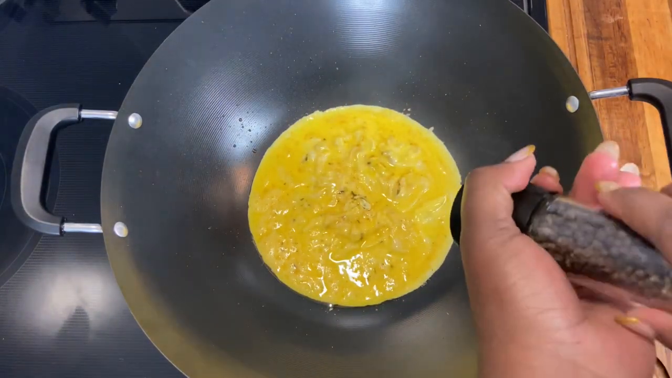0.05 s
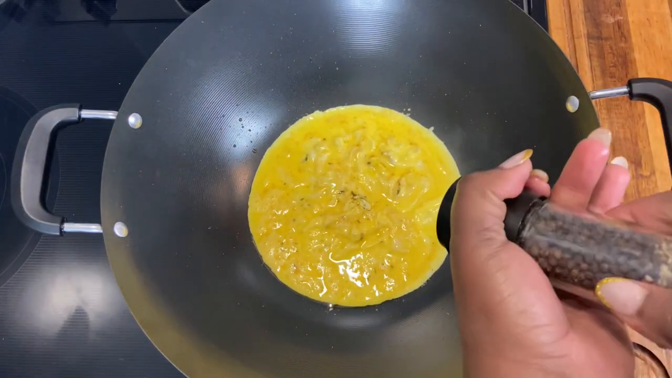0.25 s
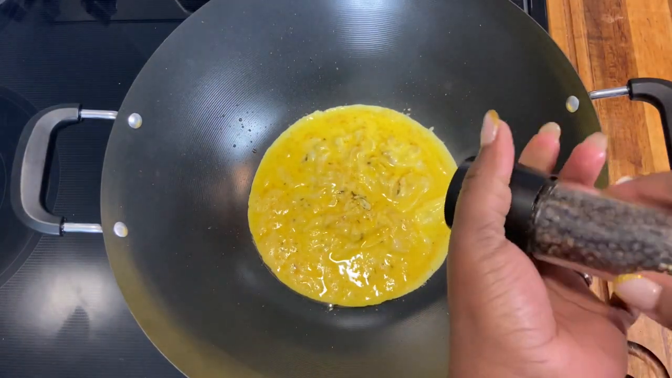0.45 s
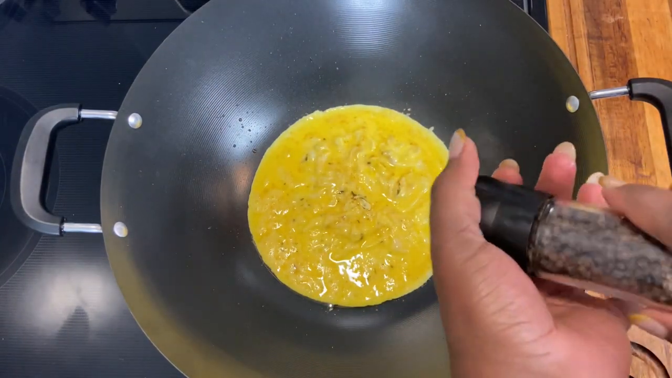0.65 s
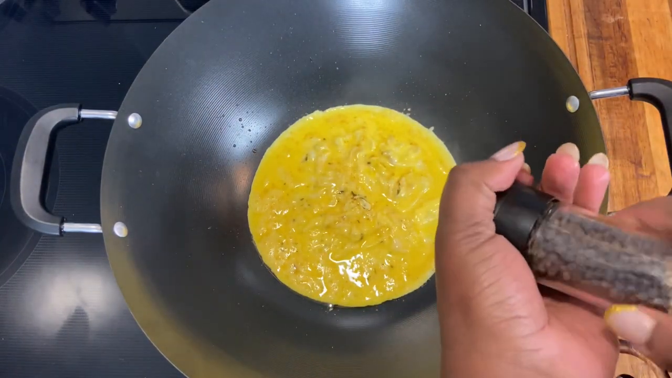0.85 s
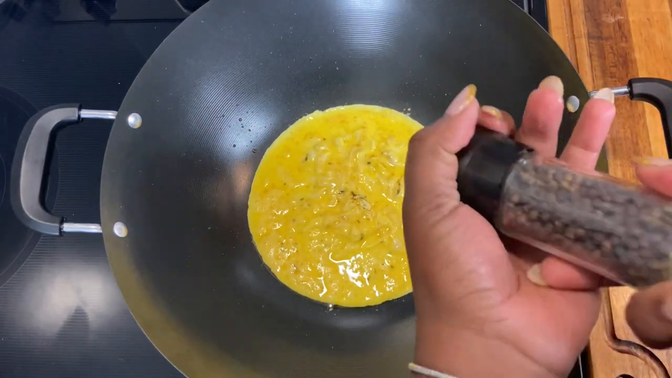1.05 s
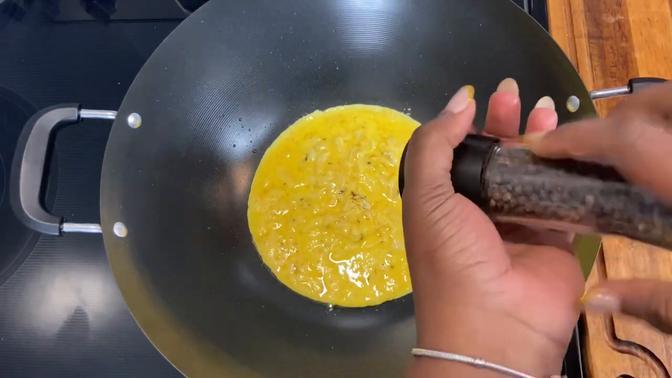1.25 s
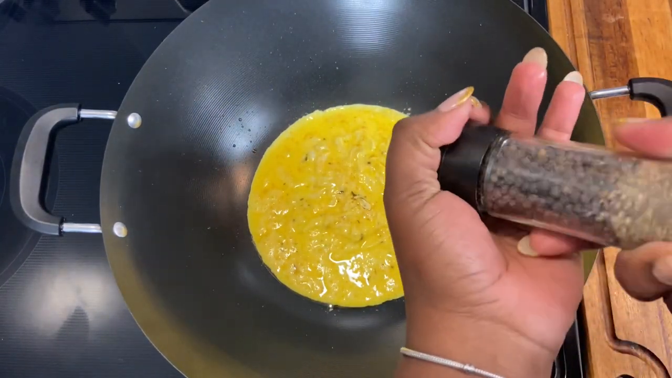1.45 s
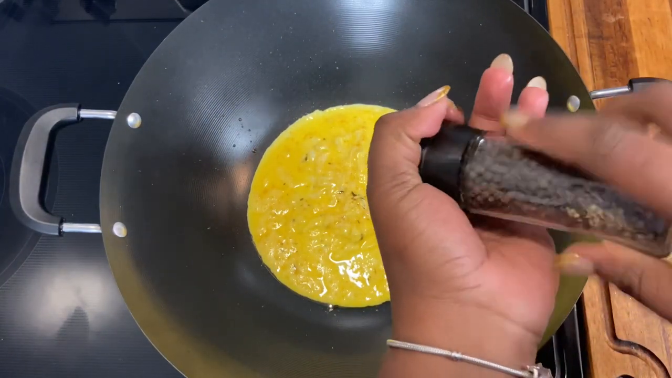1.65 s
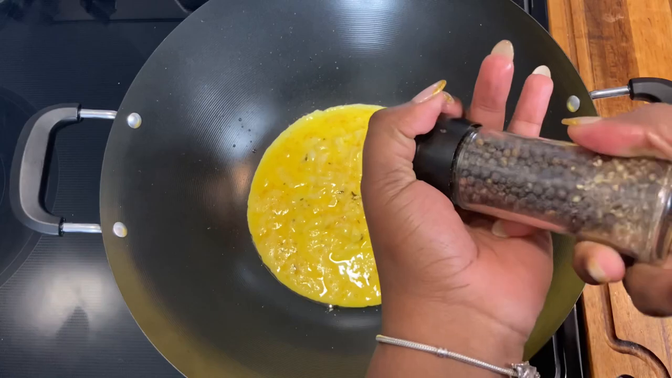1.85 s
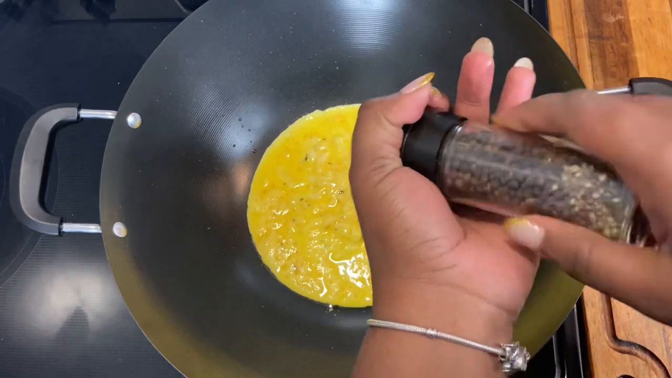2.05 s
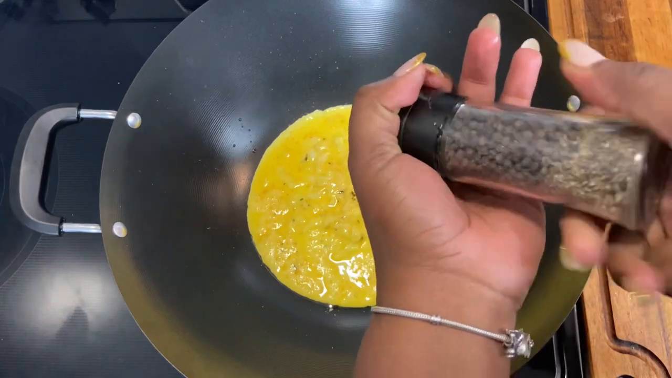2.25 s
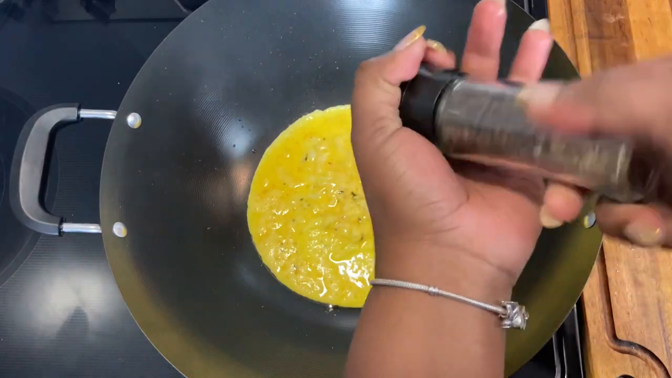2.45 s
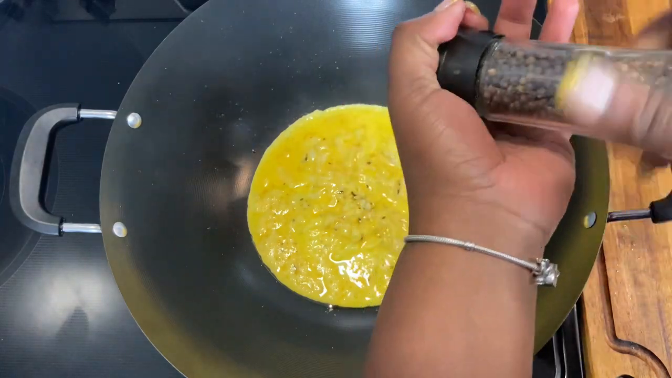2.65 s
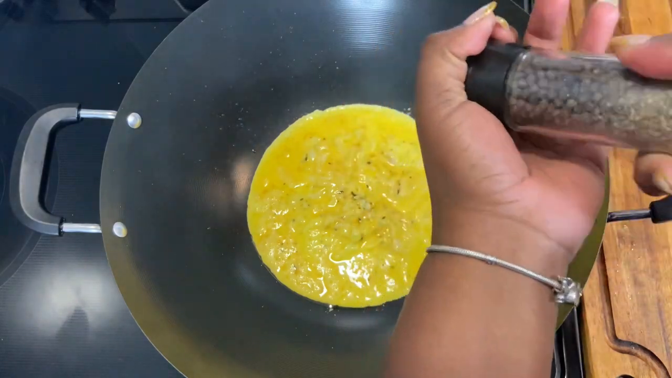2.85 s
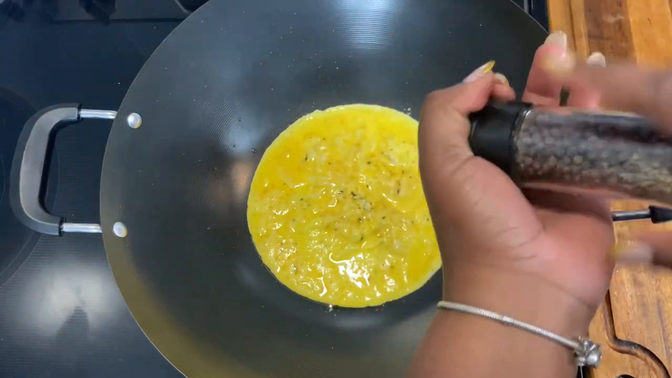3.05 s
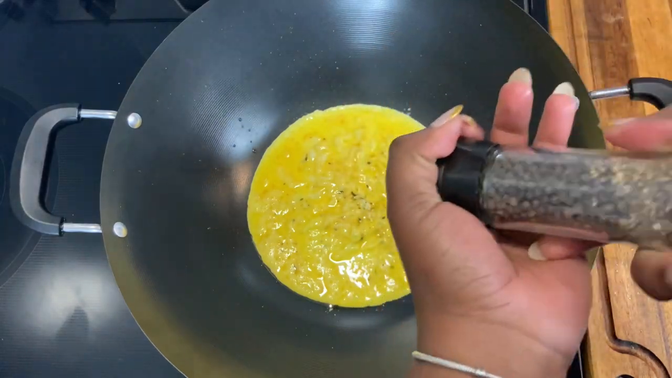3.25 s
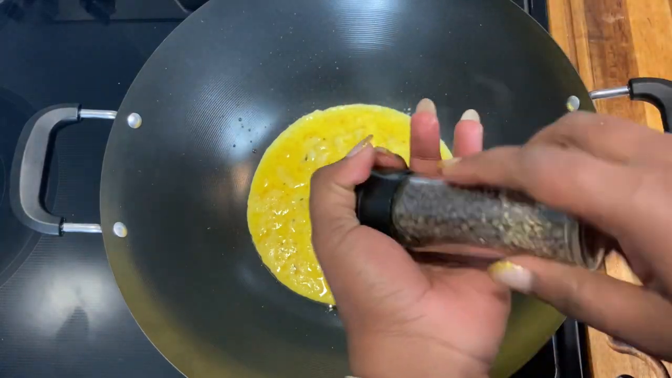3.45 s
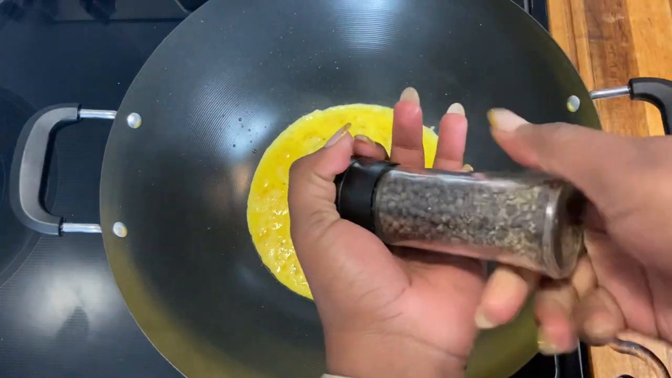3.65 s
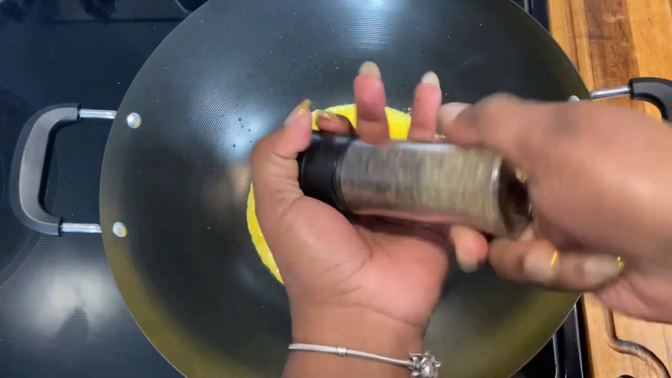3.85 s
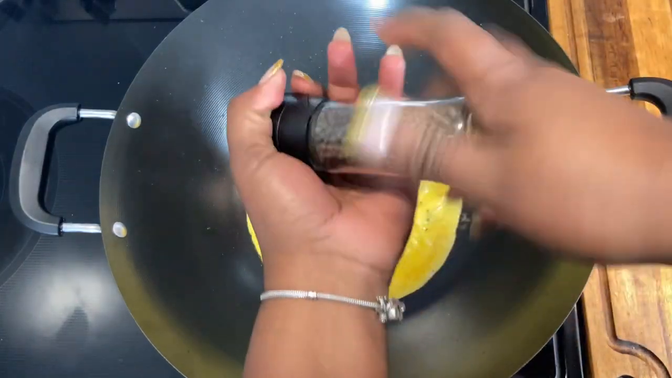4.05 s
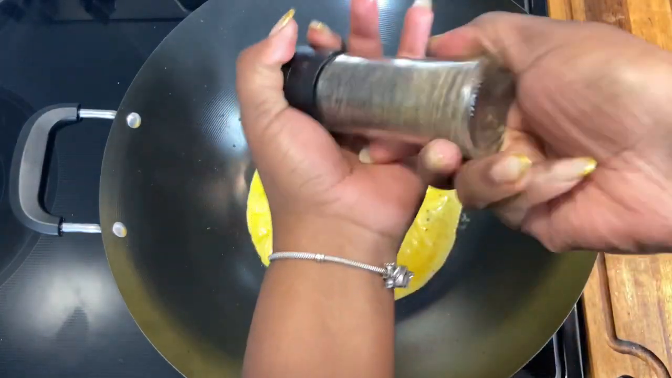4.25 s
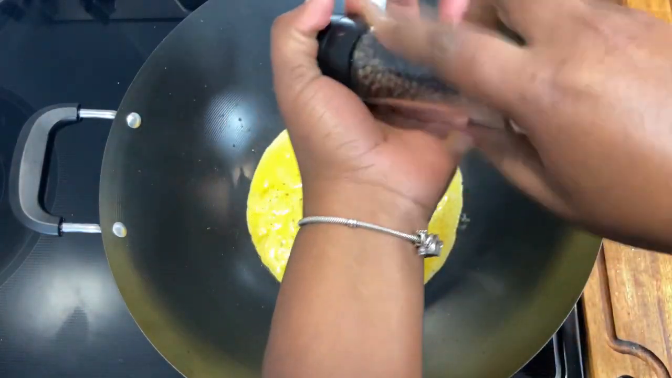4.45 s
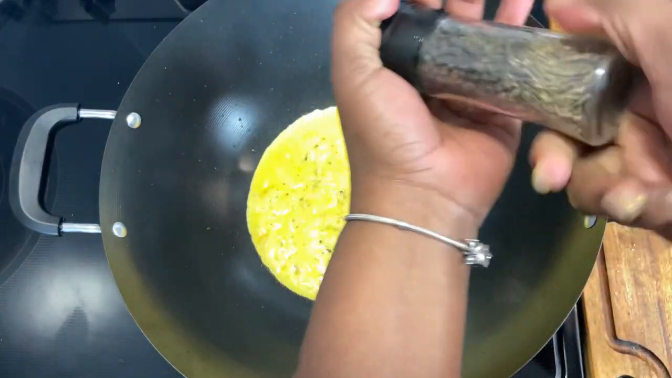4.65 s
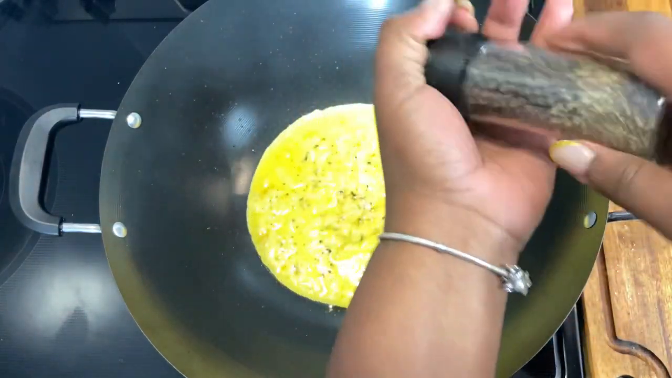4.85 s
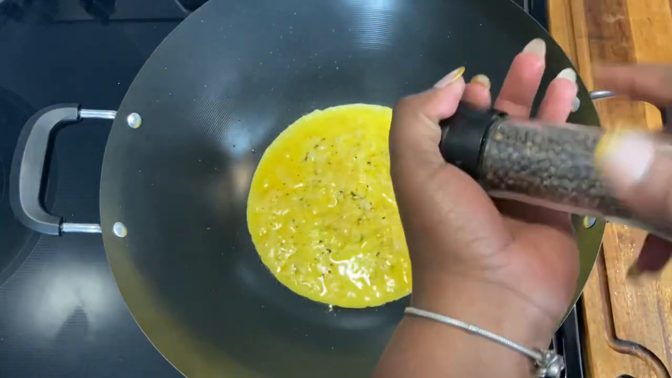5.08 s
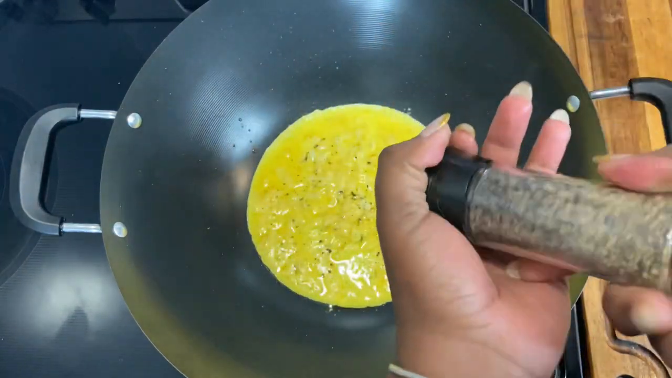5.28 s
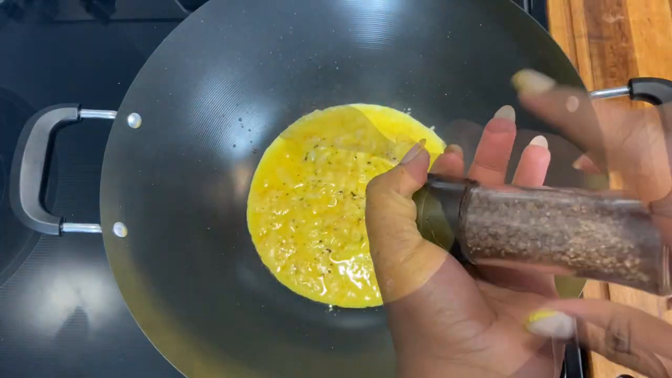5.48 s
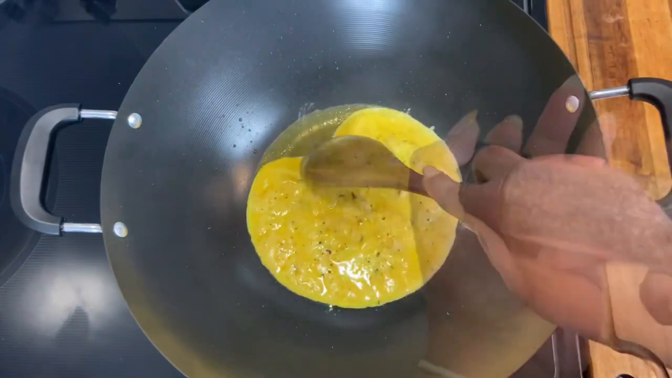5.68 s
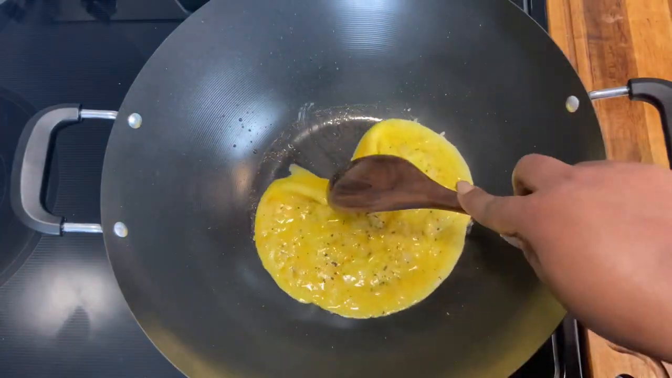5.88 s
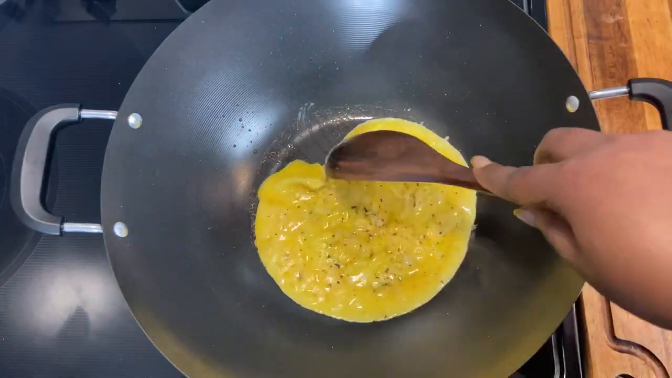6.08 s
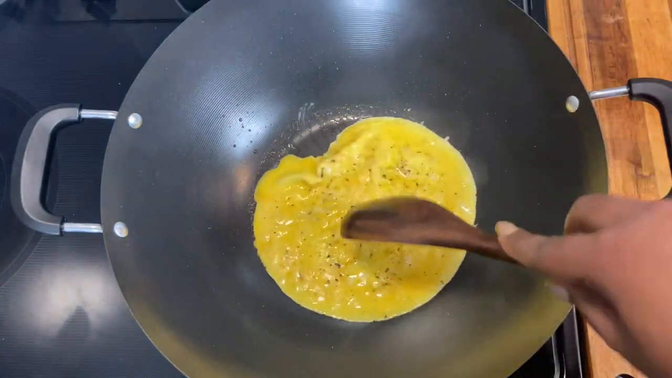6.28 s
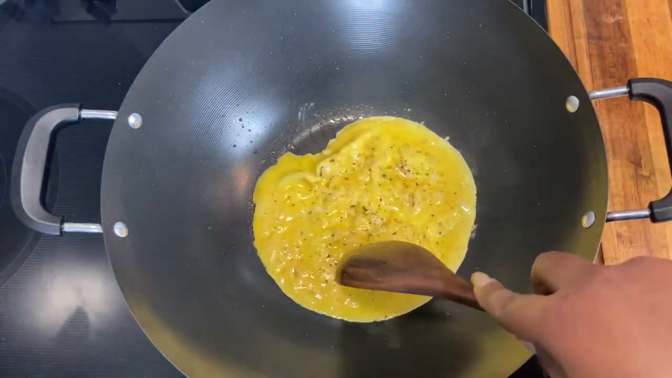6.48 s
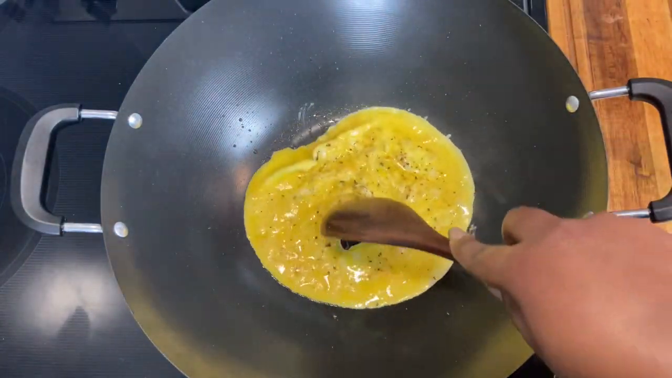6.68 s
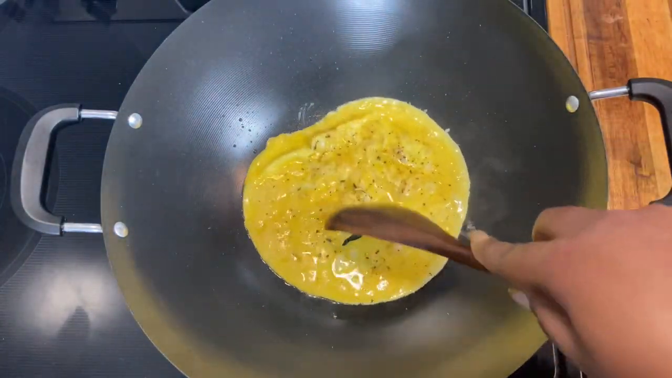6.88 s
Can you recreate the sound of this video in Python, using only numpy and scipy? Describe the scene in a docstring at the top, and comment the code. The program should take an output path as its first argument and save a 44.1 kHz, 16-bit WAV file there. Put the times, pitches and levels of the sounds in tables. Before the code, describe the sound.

A pepper grinder crunches in short, regular twists, about three a second, close by in a small kitchen, then egg sizzles softly under a spoon.

```python
"""Pepper grinder over a wok of egg

A small kitchen, heard by two close microphones with the grinder off to the right: about three hand twists a second.
In each twist a few peppercorns snap as short noise bursts over a crunch of tiny random fractures;
resonances of the grinder colour them, and a decaying noise tail throws them back from the room.
Low air noise and wavering tones make the stove's hum.
At the end a wooden spoon, a swell of noise, pushes through egg that sizzles in a train of tiny pops."""
import sys
import numpy as np
from scipy import signal
from scipy.fft import rfft, irfft
from scipy.io import wavfile
from scipy.ndimage import uniform_filter1d

SR = 44100
rng = np.random.default_rng(int(sys.argv[2]) if len(sys.argv) > 2 else 0)


def log_audio(samples):
    """Write samples as a 16-bit WAV file to the path given in sys.argv[1]."""
    # one column per channel
    frames = np.atleast_2d(samples).T
    # limit to full scale, then quantise
    limited = np.clip(frames, -1, 1)
    pcm = np.round(limited * 32767).astype(np.int16)
    wavfile.write(sys.argv[1], SR, pcm)


N = 305172
TIME = np.arange(N) / SR


def amp(db):
    """Decibels as a gain."""
    return 10 ** (np.asarray(db) / 20)


def unit(x):
    """Scale a sound to rms 1."""
    return x / np.sqrt(np.mean(x ** 2) + 1e-20)


def read(points, hz):
    """A table joined by straight lines on a log-frequency axis."""
    table_hz, value = np.transpose(points)
    return np.interp(np.log(hz + 1), np.log(table_hz + 1), value)


def level(points):
    """A (time_s, level_db) curve as a gain for every sample."""
    return amp(np.interp(TIME, *np.transpose(points)))


def add(mix, start_s, sound):
    """Lay a sound into the mix from its start, cut off at the end of the mix."""
    part = mix[..., max(round(start_s * SR), 0):][..., :sound.shape[-1]]
    part += sound[..., :part.shape[-1]]


def colour(x, points, rings=(), size=4096):
    """Causal minimum-phase filter of unit energy from a broad spectrum plus resonances."""
    hz = abs(np.fft.fftfreq(size, 1 / SR))
    db = read(points, hz)
    for ring_hz, width_hz, top_db in rings:
        db = db + top_db / (1 + (2 * (hz - ring_hz) / width_hz) ** 2)
    spectrum = np.exp(np.conj(signal.hilbert(np.log(amp(db)))))
    taps = np.fft.ifft(spectrum).real[:size // 2]
    taps = taps / np.linalg.norm(taps)
    return signal.fftconvolve(np.atleast_2d(x), taps[None], axes=1)[:, :x.shape[-1]]


# how alike the two channels of the diffuse sound are: pitch_hz, correlation
LIKENESS = [(60, 1), (300, 0.54), (600, -0.2), (1300, 0.28), (2500, .2), (4000, 0.42), (9000, -0.27),
            (10500, 0.17), (11500, 1), (13300, 0.8), (15000, -.3)]


def diffuse(pair):
    """Two unrelated signals become the two channels of one diffuse field, alike by a set amount at each pitch."""
    a, b = rfft(pair)
    same = np.clip(read(LIKENESS, np.fft.rfftfreq(pair.shape[1], 1 / SR)), -1, 1)
    mid = a * np.sqrt((1 + same) / 2)
    side = b * np.sqrt((1 - same) / 2)
    return irfft(np.array([mid + side, mid - side]), pair.shape[1])


def toward_mics(x, lag_ms=0.17, shade_db=-1):
    """Sound from the right reaches the left microphone later and weaker."""
    hz = np.fft.rfftfreq(N, 1 / SR)
    late = irfft(rfft(x) * np.exp(-2j * np.pi * hz * lag_ms / 1000), N)
    return np.array([amp(shade_db) * late, x])


def wander(rate):
    """Slow random drift of rms 1; a higher rate (Hz) drifts faster."""
    lowpass = np.exp(-(np.fft.rfftfreq(N, 1 / SR) / rate) ** 2)
    return unit(irfft(rfft(rng.standard_normal(N)) * lowpass, N))


def grains(per_s, spread_db):
    """A random train of single-sample clicks, a few much larger than the rest."""
    size = amp(spread_db * np.minimum(rng.exponential(1, N), 4))
    return unit(size * rng.choice([-1, 1], N) * (rng.random(N) < per_s / SR))


def diffuse_grains(per_s, spread_db):
    """Two unrelated click trains spread around the microphones."""
    return diffuse(np.array([grains(per_s, spread_db) for _ in range(2)]))


def wash(points):
    """Diffuse noise of one colour, rms 1."""
    return unit(colour(diffuse(rng.standard_normal((2, N))), points))


def swells(rows):
    """A soft rise and fall for each (start_s, length_s, level_db)."""
    out = np.zeros(N)
    for start_s, length_s, db in rows:
        add(out, start_s, amp(db) * np.hanning(int(length_s * SR)) ** .75)
    return out


# air noise of the kitchen: pitch_hz, relative level_db
KITCHEN = [(15, -31), (25, -12), (80, 0), (149, -9.5), (217, -8), (531, -14), (796, -17.5), (1560, -27),
           (3160, -31.5), (3430, -31.5), (3720, -30), (10400, -41.5), (11600, -47.5), (13600, -42.5),
           (16000, -69.5)]
# steady stove tones: pitch_hz, level_db
HUM = [(81, -71.5), (193, -64.5), (361, -67.5), (1324, -79.5), (1954, -86.5)]
# one stronger stove tone swells and fades: time_s, level_db
DRONE = [(0, -69), (0.8, -68), (1.3, -59), (5.4, -56.5), (5.798, -73.5), (6.92, -62.5)]
DRONE_HZ = 220.5


def stove():
    """Low air noise with a few stove tones that waver in phase and level."""
    def tone(hz):
        phase = 2 * np.pi * hz * TIME + 1.1 * wander(rate=6.3)
        return np.sqrt(2) * np.sin(phase) * amp(2.4 * wander(rate=5.5))
    hum = sum(amp(db) * tone(hz) for hz, db in HUM) + level(DRONE) * tone(DRONE_HZ)
    air = amp(-53.5) * wash(KITCHEN) * amp(.8 * wander(rate=1.7))
    return hum + air


# time for the kitchen echo to die by 60 dB: pitch_hz, t60_s
ROOM_T60 = [(250, 0.36), (700, 0.23), (1700, 0.26), (4000, 0.29), (6500, 0.27), (9000, 0.21), (14000, 0.21)]


def room(x, wet_db=-10, rise_s=0.00074, drift_hz=0.91, size=22000, count=3):
    """A small hard kitchen, each band dying at its own speed; noise tails take turns, so the echo drifts slowly."""
    tint = [(300, 3.5), (600, 2), (1500, 4.5), (3600, 1.5), (6200, 5.5), (9000, 4.0), (13500, -1.0), (15500, -17)]
    out = np.zeros((2, N))
    for k in range(count):
        hz, t, bands = signal.stft(rng.standard_normal((2, size)), SR, nperseg=256)
        decay = amp(-60 * t / read(ROOM_T60, hz)[:, None])
        tail = signal.istft(bands * decay, SR, nperseg=256)[1][:, :size]
        tail = diffuse(tail) * (1 - np.exp(-(TIME[:size] / rise_s) ** 2))
        tail = colour(tail, tint)
        # the tails take turns, with a constant sum of squared shares
        share = np.cos(np.pi * (drift_hz * TIME + k / count)) * np.sqrt(2 / count)
        out += signal.fftconvolve(x * share, tail / np.linalg.norm(tail[0]), axes=1)[:, :N]
    return amp(wet_db) * out


# colour of the frying egg: pitch_hz, relative level_db
SIZZLE = [(200, -10), (600, 7.5), (1500, -2), (2400, -2.5), (4500, 0), (6000, 1.5), (8000, 0.5),
          (10000, 1.5), (13500, 2.5), (15500, -8)]
# loudness of the frying egg: time_s, level_db
FRYING = [(0, -80.5), (5.4, -73.5), (5.75, -57), (6.1, -55.5), (6.5, -60), (6.92, -56)]
# colour of the spoon over steel: pitch_hz, relative level_db
SPOON = [(300, 8), (900, 0), (1400, -5.5), (2000, 4), (3000, -6.5), (6500, 2.5), (9000, -4.5),
         (13000, -3.5), (15000, -15)]
# loudness of the spoon pushing through the egg: time_s, level_db
STIRRING = [(6.5, -78), (6.6, -54.5), (6.67, -48.5), (6.76, -53.5), (6.84, -66), (6.92, -59)]


def egg():
    """Tiny bubbles burst at the edge of the egg; the spoon swishes over the steel."""
    pops = toward_mics(grains(per_s=1100, spread_db=4.5), lag_ms=0.16, shade_db=-4.5)
    sizzle = unit(unit(colour(pops, SIZZLE)) + amp(1.5) * wash(SIZZLE))
    frying = level(FRYING) * sizzle * amp(0.99 * wander(rate=35))
    return frying + level(STIRRING) * wash(SPOON)


def cracks(rows, gain_db, split_s=0.0012, echo_s=.003, echo_db=-4, scatter_s=0.0084, scatter_db=-3,
           ragged_db=3.5, strain_db=-27, size=2048):
    """Each crack: a faint strain, a brief splitting, its echo off the wok, then a scatter between hand and jar."""
    lead = size // 8
    t = (np.arange(size) - lead) / SR

    def pulse(start_s, rise_s, fall_s):
        age = np.maximum(t - start_s, 0)
        return (1 - np.exp(-age / rise_s)) * np.exp(-age / fall_s)

    strain = amp(strain_db) * np.exp(-abs(t) / .003)
    echo = amp(echo_db) * pulse(echo_s, 0.00055, split_s)
    splitting = np.hypot(pulse(0, 0.00013, split_s), echo) + strain
    scattering = pulse(0, split_s, scatter_s)
    direct, scatter = np.zeros(N), np.zeros((2, N))
    for s, db, body, ring, treble in rows:
        burst = rng.choice([-1., 1.], (3, size))
        lumps = amp(ragged_db * unit(uniform_filter1d(rng.standard_normal(size), size=40)))
        burst *= [splitting, lumps * scattering, lumps * scattering]
        burst /= np.linalg.norm(burst, axis=1, keepdims=True)
        tint = [(1300, body), (2600, ring), (4100, ring), (5200, 0.0092), (7000, 0.0032), (9500, treble)]
        burst = amp(db + gain_db) * colour(burst, tint, size=256)
        add(direct, s - lead / SR, burst[0])
        add(scatter, s - lead / SR, burst[1:])
    return toward_mics(direct) + amp(scatter_db) * diffuse(scatter)


# the hands settle on the jar: time_s, level_db before its rise and fade
HANDLING = [(0, -41), (0.42, -45), (0.7, -55.5)]


def settling(rise_s=.025, fade_db_per_s=72):
    """Loudness of the hands' touches: each rises quickly and fades."""
    out = np.zeros(N)
    for s, db in HANDLING:
        rise = np.clip((TIME - s) / rise_s, 0, 1)
        out += rise * amp(db - fade_db_per_s * abs(TIME - s))
    return out


# light ticks of fingers, grains and spoon: start_s, level_db before a common gain, brightness_db
TICKS = [(0.045, -48, 5), (0.167, -47.5, -11), (0.235, -33, -7), (0.404, -38, -11.5), (0.7865, -38, -1),
         (1.949, -43.5, -9), (4.088, -42, 18), (4.812, -41, 18), (5.495, -49, 10), (6.05, -51, 0),
         (6.538, -45.5, 13)]
# colour of a light tick on jar or wok: pitch_hz, relative level_db
TAP = [(200, -21.5), (700, -18), (1200, -9.5), (2400, 0.5), (3300, 0.5), (5500, -8), (8000, -6.5),
       (12000, -4), (15500, -10.5)]
# skin rubbing over the jar while the first grip is taken: start_s, length_s, level_db
RUBS = [(0.07, 0.24, -63), (0.265, 0.057, -56.5), (0.455, 0.088, -58)]
# colour of the rubbing skin: pitch_hz, relative level_db
SKIN = [(500, -8), (2000, -5.5), (4300, 3), (7000, -2), (9500, -5), (12500, -2), (15500, -9.5)]
# dull colour of the settling hands: pitch_hz, relative level_db
HAND = [(30, -7), (100, 3), (180, -2.5), (300, -7), (600, -18), (2000, -28.5), (8000, -65)]


def hands():
    """Light ticks as small cracks, skin rubbing as noise, and the dull rumble of the hands settling on the jar."""
    taps = [(s, db, 0, 0, bright_db) for s, db, bright_db in TICKS]
    ticks = colour(cracks(taps, gain_db=20, split_s=.0015, echo_db=-7, scatter_db=-5, strain_db=-34), TAP)
    rubbing = swells(RUBS) * wash(SKIN) * amp(2 * wander(rate=69))
    rumble = settling() * wash(HAND) * amp(1.5 * wander(rate=40))
    return ticks + rubbing + rumble


# twists of the grinder: start_s, length_s, crunch_db, knock_db of the housing,
# slide_lead_s before the twist, slide_db, then the tint of its snaps: body_db, ring_db, treble_db
TWISTS = [(0.884, 0.049, -30.5, -41, .06, -58.5, -1.5, 4, 2),
          (1.351, 0.074, -28.5, -42.5, 0.097, -45, -3.5, -2, 2),
          (1.718, 0.057, -25, -44.5, 0.06, -45, -2, 1, 2),
          (2.079, 0.076, -34, -45.5, 0.058, -41, -1.5, 0, 2.5),
          (2.435, 0.052, -27, -45, 0.061, -46.5, 1.5, 1.5, -1),
          (2.787, 0.037, -27, -37, 0.075, -43.5, -3, 2, 2), (3.139, 0.06, -29, -46, 0.08, -45, 2.5, 0, 1.5),
          (3.479, 0.072, -34, -40, 0.049, -46, -0.5, 0, -1.5),
          (3.82, 0.062, -36, -44.5, 0.063, -49.5, -2, -2.5, 0.5),
          (4.19, .062, -30, -47, .068, -50, 1, 3, -5), (4.530, .08, -32, -44, 0.085, -40.5, 0.5, 0.5, -2),
          (4.888, .051, -30.5, -46.5, 0.088, -50, 3.5, 0, 1),
          (5.238, .061, -31, -40, 0.075, -48, -3, -0.5, 2.5),
          (5.577, 0.067, -40, -45.5, 0.053, -55, 8, 1, 4.5)]


def slides():
    """Corns slide in the jar as the hand takes a new grip before each twist: (start_s, length_s, level_db)."""
    return [(start - lead, 0.065, db) for start, _, _, _, lead, db, *_ in TWISTS]


# colour of the knocking housing: pitch_hz, relative level_db
HOUSING = [(120, -22), (230, -20.5), (310, -3), (390, -5), (490, -2), (580, -16), (690, -23.5),
           (1250, -20.5), (2000, -44.5)]


def milling(ease_s=0.004, clump_db=3):
    """While the burrs turn, fragments crumble in clumps and the housing knocks."""
    crunch, knock = np.zeros(N), np.zeros(N)
    for start, length, crunch_db, knock_db, *_ in TWISTS:
        end = start + length
        turning = np.interp(TIME, [start, start + ease_s, end - ease_s, end + ease_s], [0, 1, 1, 0])
        crunch += amp(crunch_db) * turning
        knock += amp(knock_db) * turning
    crumbs = toward_mics(grains(per_s=950, spread_db=0.5)) + diffuse_grains(per_s=2500, spread_db=4)
    crumbs = colour(crumbs, [(1000, 2.2), (6000, 0.0), (11000, -4.5)])
    crumbs = unit(crumbs * amp(clump_db * wander(rate=190)))
    knocks = unit(colour(toward_mics(grains(per_s=860, spread_db=1.5)), HOUSING))
    return crunch * crumbs, knock * knocks


# whole peppercorns snapping: start_s, level_db before a common gain
SNAPS = [(0.8153, -15), (0.8196, -12.5), (0.8801, -9.5), (0.8945, -14.5), (0.9252, -26.5), (1.3572, -17.5),
         (1.3662, -13), (1.3775, -13), (1.394, -21.5), (1.4334, -16), (1.7089, -23), (1.7403, -16.5),
         (1.752, -12.5), (1.7647, -13), (2.0573, -31), (2.0765, -24), (2.1094, -20.5), (2.1286, -20),
         (2.4095, -29.5), (2.4369, -12), (2.449, -13.5), (2.4693, -17), (2.7762, -11), (2.795, -14),
         (2.8173, -12), (3.1445, -18), (3.1499, -14), (3.1643, -15), (3.4766, -15), (3.498, -22),
         (3.5212, -15), (3.817, -16), (3.8275, -11.5), (3.8356, -15.5), (4.1665, -17.5), (4.1884, -11.5),
         (4.2036, -16.5), (4.248, -22), (4.4894, -23.5), (4.5092, -22), (4.5332, -13.5), (4.5546, -12),
         (4.569, -23), (4.6, -23.5), (4.8913, -13.5), (4.908, -16), (4.9375, -16.5), (5.2355, -13),
         (5.2658, -19), (5.2788, -14), (5.5742, -29), (5.606, -27.5)]
# harder snaps have less body: body, ring, treble [dB per dB above a usual snap]
TINT_PER_DB = (-0.3, -0.04, -0.05)
USUAL_SNAP_DB, TINT_SPREAD_DB = -15, 2
# smaller pieces break at random: how often (at least one a twist), how far above the crunch table, how unequal
CHIPS_PER_S, CHIP_OVER_CRUNCH_DB, CHIP_SPREAD_DB = 22, 3.5, 2


def snaps():
    """Whole corns and random chips of every twist: (start_s, level_db, body_db, ring_db, treble_db)."""
    breaks = list(SNAPS)
    for start, length, crunch_db, *_ in TWISTS:
        count = max(round(length * CHIPS_PER_S), 1)
        times = start + length * (np.arange(count) + rng.random(count)) / count
        chip_db = crunch_db + CHIP_OVER_CRUNCH_DB + CHIP_SPREAD_DB * rng.standard_normal(count)
        breaks += zip(times, chip_db)
    twists, rows = np.array(TWISTS), []
    for s, db in breaks:
        nearest = np.argmin(abs(twists[:, 0] - s))
        tint = twists[nearest, -3:] + np.array(TINT_PER_DB) * (db - USUAL_SNAP_DB)
        tint = tint + TINT_SPREAD_DB * rng.standard_normal(3)
        rows.append((s, db, *tint))
    return rows


# broad colour of the grinder: pitch_hz, relative level_db
SHELL = [(100, -31), (230, -19), (310, -11), (510, -13), (700, -23), (1100, -9), (1750, -14.5),
         (2700, -5.5), (4500, -6.5), (6600, -3), (7600, -10), (10200, -8.5), (13500, -10), (15800, -27.5)]
# resonances of the grinder: pitch_hz, width_hz, height_db
RINGS = [(1295, 160, 2), (1880, 50, 6), (3456, 240, 4.6), (3804, 480, 7.3), (5400, 150, 1.6),
         (5860, 120, 3.8), (12600, 310, 1.5)]
# colour of corns sliding in the jar: pitch_hz, relative level_db
JAR = [(500, -10), (2500, -19.5), (4900, -10.5), (5950, 4.5), (7300, -11), (9500, -22), (11300, -6),
       (12200, -13), (13200, 4), (15000, -24)]


def grinder():
    """Snaps and crunch ring the grinder's shell; loose corns slide in the jar between strokes."""
    crunch, knock = milling()
    ringing = colour(cracks(snaps(), gain_db=20.5) + crunch, SHELL, RINGS)
    corns = unit(colour(diffuse_grains(per_s=5300, spread_db=5), JAR))
    catching = amp(3 * wander(rate=60))
    sliding = swells(slides()) * corns * catching
    return ringing + knock + sliding


def scene():
    """Grinder and hands with their kitchen echo, tipped slightly to the right, over egg and stove."""
    near = grinder() + hands()
    balance = amp([[-.25], [.25]])
    return (near + room(near)) * balance + egg() + stove()


def record(dry):
    """The microphones' bass roll-off, a soft ceiling on the sharpest peaks, and the recorder's band limit."""
    bass_cut = signal.butter(N=6, Wn=35, btype="high", fs=SR, output="sos")
    thinned = signal.sosfilt(bass_cut, dry)
    rounded = thinned / (1 + (thinned / .72) ** 4) ** .25
    band_limit = signal.firwin(255, 16000, window=("kaiser", 9), fs=SR)
    return signal.oaconvolve(rounded, band_limit[None], "same")


dry = scene()
out = record(dry)
log_audio(out)
```